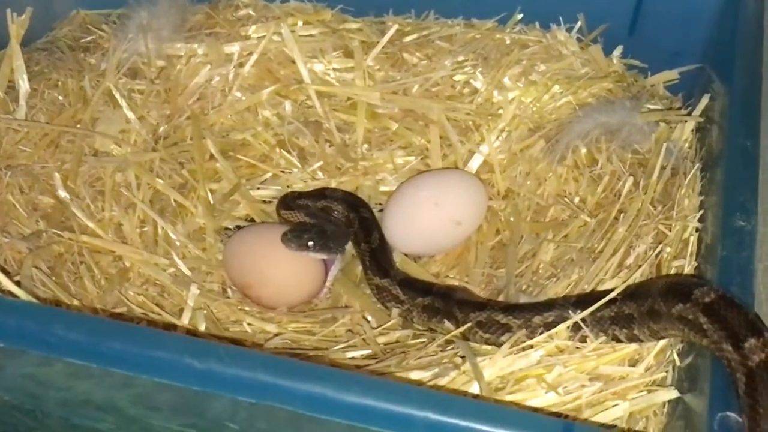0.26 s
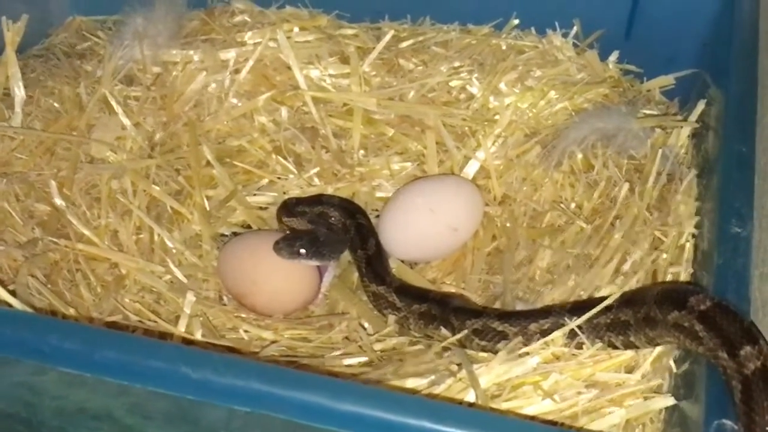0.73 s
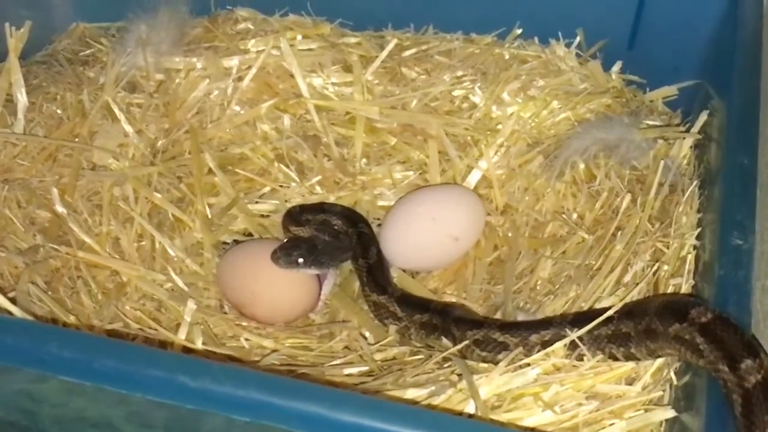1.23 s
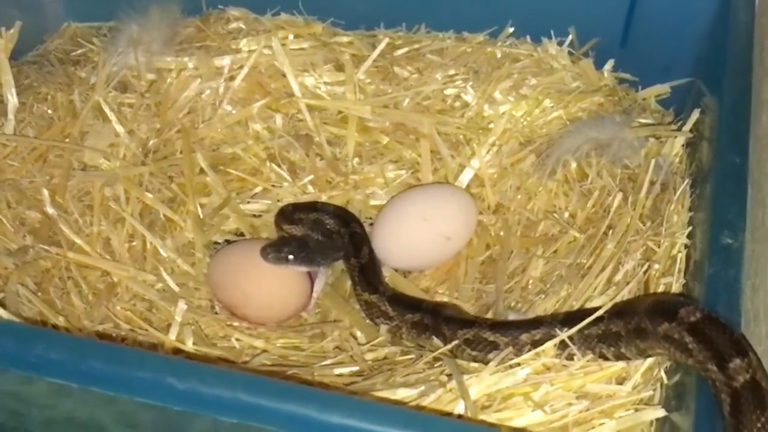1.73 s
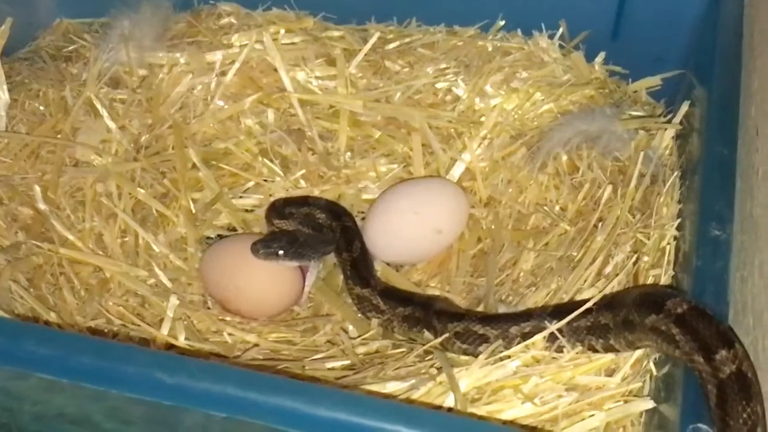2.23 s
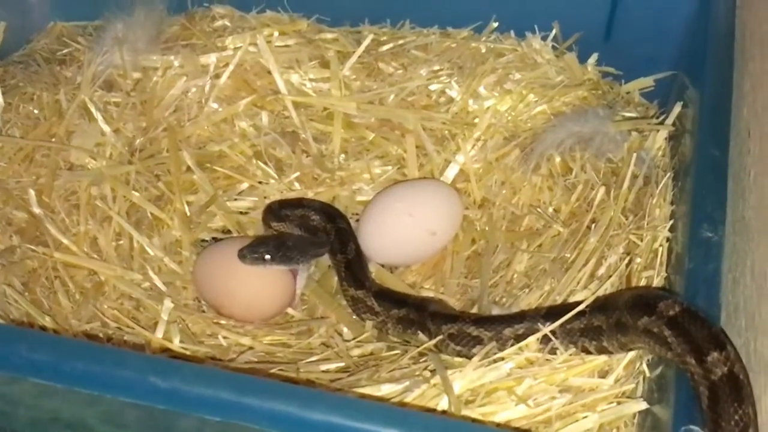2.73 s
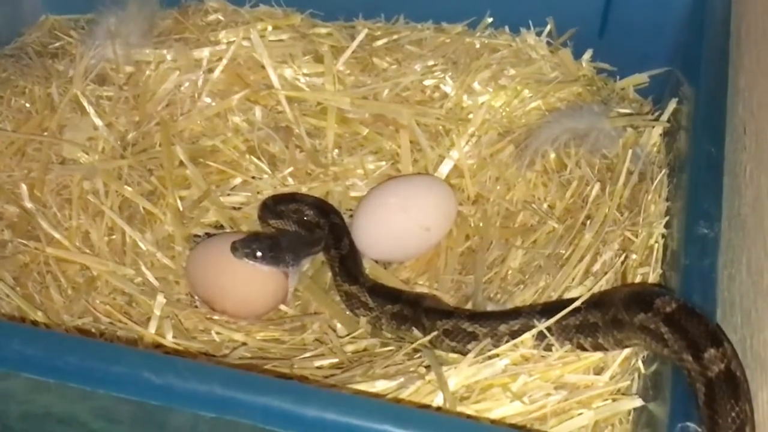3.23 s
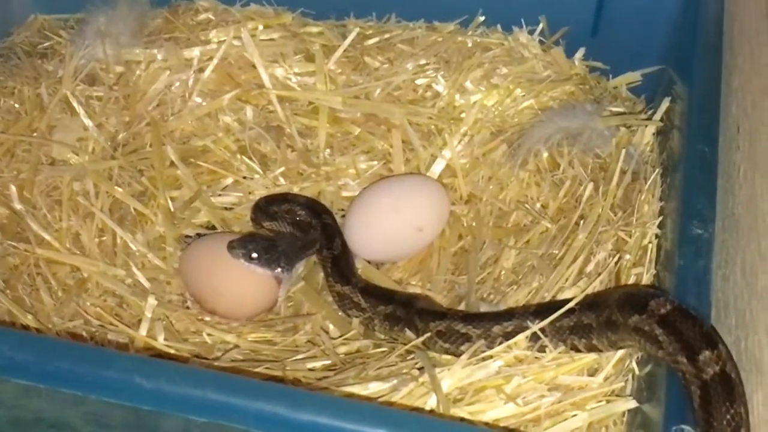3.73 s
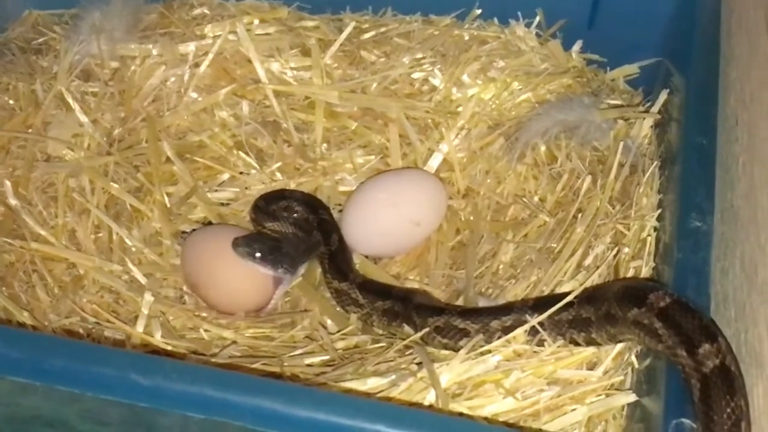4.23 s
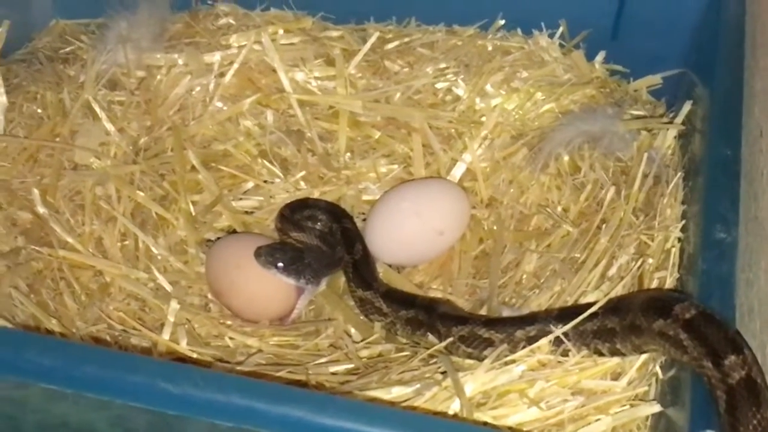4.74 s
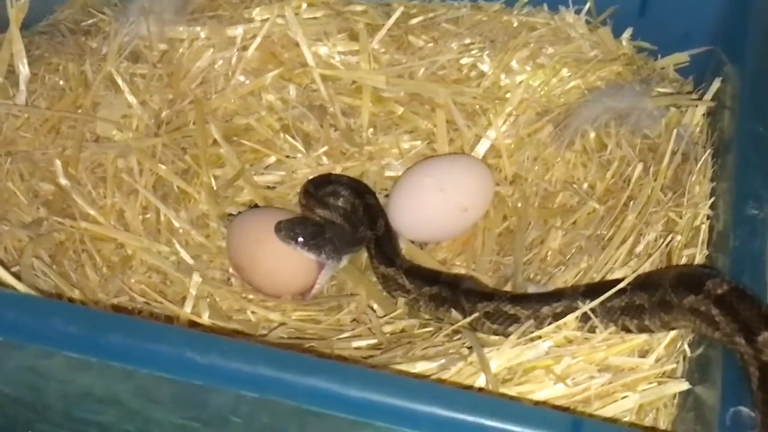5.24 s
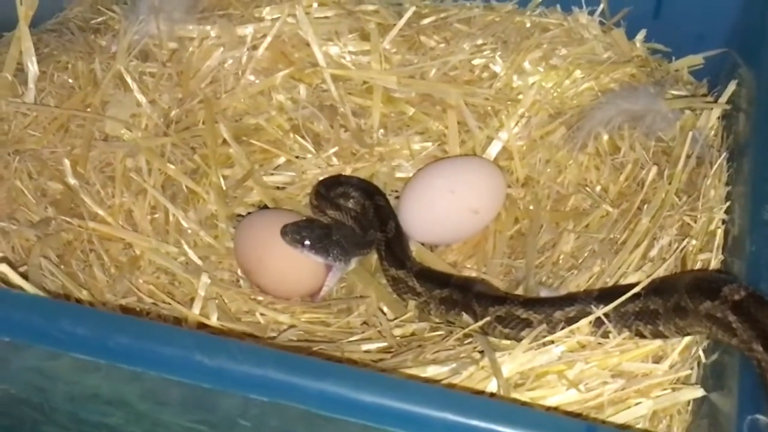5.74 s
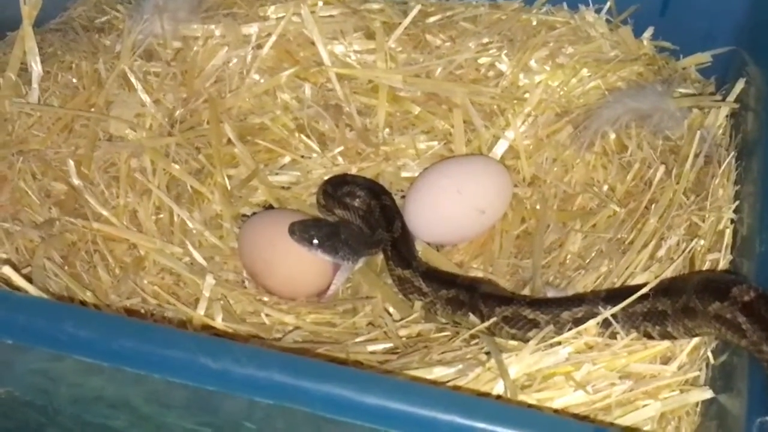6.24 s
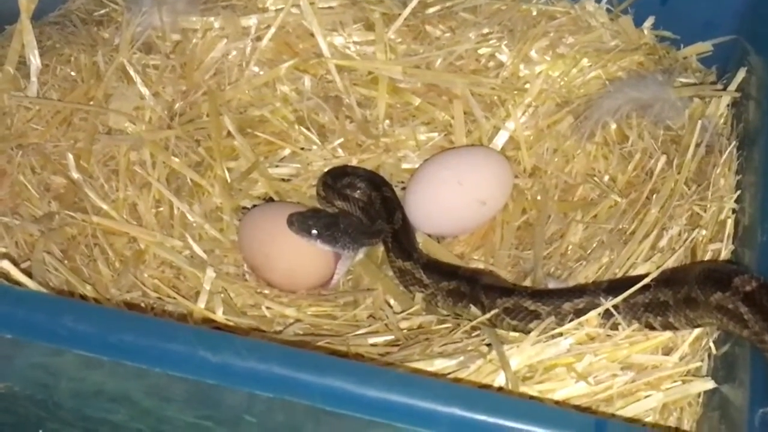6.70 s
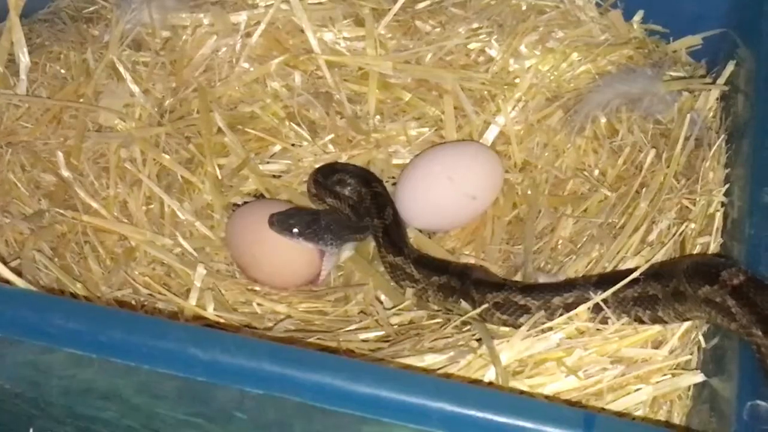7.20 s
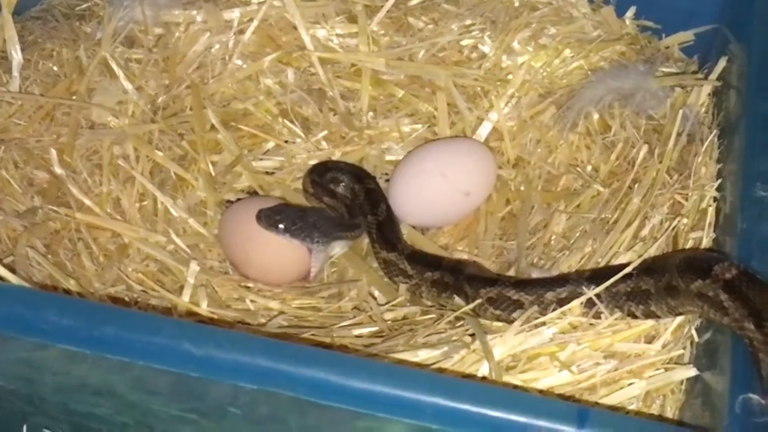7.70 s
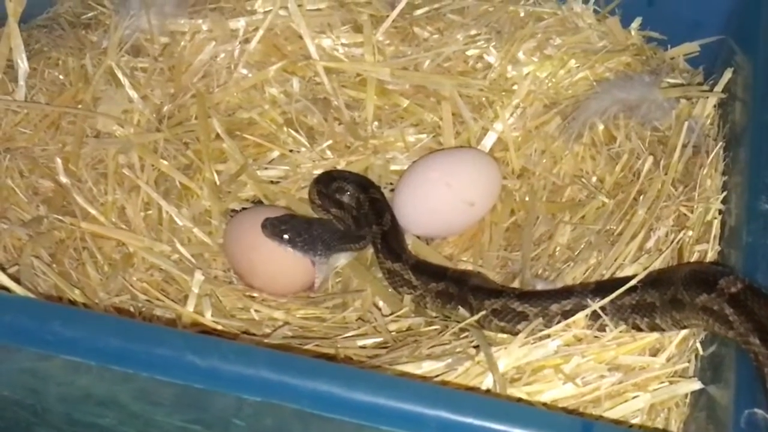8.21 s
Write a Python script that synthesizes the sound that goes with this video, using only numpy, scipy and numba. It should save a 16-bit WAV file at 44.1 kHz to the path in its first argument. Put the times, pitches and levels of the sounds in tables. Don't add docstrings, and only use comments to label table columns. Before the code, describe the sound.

Inside a small coop a hen growls long and hoarse twice, a short yelp between, then clucks clearly over crackling straw and low hum.

```python
import sys
import numpy as np
from scipy import signal
from scipy.io import wavfile
from scipy.ndimage import uniform_filter1d
from numba import njit

SR = 44100
rng = np.random.default_rng(int(sys.argv[2]) if len(sys.argv) > 2 else 0)


def attenuation_scalar(level_db):
    decades = np.asarray(level_db, float) / 20
    return 10 ** decades


def dump(signal):
    limited = np.clip(np.atleast_2d(signal).T, -1, 1)
    pcm = np.round(limited * 32767).astype(np.int16)
    wavfile.write(sys.argv[1], SR, pcm)


N = 373086
T = np.arange(N) / SR


def level(x, db):
    return x * attenuation_scalar(db) / np.sqrt(np.mean(x ** 2))


def colour(x, shape):
    hz, db = np.transpose(shape)
    f = np.arange(1, 2050) * SR / 4096
    cepstrum = np.fft.irfft(np.log(attenuation_scalar(np.interp(np.log(f), np.log(hz), db, db[0] - 19.0))))
    cepstrum[1:2048] *= 2
    cepstrum[2049:] = 0
    response = np.fft.irfft(np.exp(np.fft.rfft(cepstrum)))
    return signal.fftconvolve(x, response)[:len(x)]


@njit
def svf(x, hz, width):
    y, b, l = np.empty(len(x)), 0., 0.
    for i in range(len(x)):
        g, k = np.tan(np.pi * hz[i] / SR), width / hz[i]
        v = (b + g * (x[i] - l)) / (1 + g * (g + k))
        b, l, y[i] = 2 * v - b, l + 2 * g * v, k * v
    return y


def band(x, hz, width):
    return svf(x, np.full(len(x), 1. * hz), 1. * width)


def butter(x, order, hz, kind="low"):
    return signal.sosfilt(signal.butter(order, hz, kind, fs=SR, output="sos"), x)


def butter_in_phase(x, order, hz, kind="low"):
    return signal.sosfiltfilt(signal.butter(order, hz, kind, fs=SR, output="sos"), x)


def walk(rate, size=N):
    k = int(SR / rate)
    steps = np.repeat(rng.standard_normal(size // k + 1), k)
    return 1.3 * uniform_filter1d(uniform_filter1d(steps, k), k)[:size]


def follow(table, t=T):
    s, *columns = np.transpose(table)
    return [np.interp(t, s, c) for c in columns]


def unfold(table):
    span = slice(int(table[0][0] * SR), int(table[-1][0] * SR))
    return span, follow(table, T[span])


def syrinx(hz, jitter, rough, weak):
    phase = np.cumsum(hz) / SR
    sample = np.arange(len(hz))
    cycle = np.arange(1, int(phase[-1]))
    chance = rng.standard_normal((len(cycle), 2))
    at = np.interp(cycle, phase, sample)
    r = np.clip(np.interp(at, sample, rough * np.ones(len(hz))), 0, 1)
    at = np.clip(at + jitter * r * chance[:, 0] * SR / hz.mean(), 8, len(hz) - 10)
    weak = (weak * np.ones(len(hz)))[at.astype(int)]
    size = (1 - weak * (cycle % 2)) * (1 + .6 * r * chance[:, 1])
    taps = at.astype(int)[:, None] + np.arange(-7, 9)
    lag = taps - at[:, None]
    out = np.zeros(len(hz))
    np.add.at(out, taps, size[:, None] * np.sinc(lag) * np.cos(np.pi * lag / 16) ** 2)
    return out


def nest_box(x):
    scatter = .4
    for lag in (23, 41, 67, 109):
        gap = np.zeros(lag - 1)
        x = signal.lfilter(np.r_[-scatter, gap, 1], np.r_[1, gap, -scatter], x)
    return x


def clucks(calls, shape, rough, weak, wobble, hoarse=0):
    out = np.zeros(N)
    for table in calls:
        span, (hz, db) = unfold(table)
        rough_now = rough * (1 + hoarse * np.exp(-(T[span] - table[0][0]) / .022))
        pulses = syrinx(hz * (1 + wobble * walk(60, size=len(hz))), .15, rough_now, weak)
        out[span] += attenuation_scalar(db) * level(colour(pulses, shape), 0) * signal.windows.tukey(len(hz), .06)
    return out


# f/Hz, level/dB
AIR_COLOUR = [(50, -53), (85, 4.5), (101, -7), (126, -11.5), (285, -17), (355, -18), (687, -27),
              (1730, -32.5), (2460, -33), (4870, -41), (5810, -43), (9420, -47), (15000, -54), (16300, -61)]


def air():
    white = rng.standard_normal(N)
    drift = sum(attenuation_scalar(1.2 * walk(5)) * band(white, hz, .8 * hz) for hz in 140 * 2. ** np.arange(8))
    return level(colour(drift, AIR_COLOUR), -62)


# f/Hz, rms level/dB, moment of a crest t/s
MOTOR_TONES = [(36.02, -76.2, 4.2242), (60.012, -62.4, 4.2257), (61.685, -63.3, 4.2277),
               (72.035, -58.4, 4.2279), (73.398, -74.6, 4.2308), (75.315, -72.6, 4.2253)]
# f/Hz, width/Hz, rms level/dB
MOTOR_RUMBLE = [(34.8, 14, -83), (53.6, 36, -69), (70.36, 6, -66.5), (131, 1.7, -101), (240, 2.3, -77)]


def motors():
    out = sum(attenuation_scalar(db) * np.sqrt(2) * np.cos(2 * np.pi * hz * (T - crest)) for hz, db, crest in MOTOR_TONES)
    for hz, width, db in MOTOR_RUMBLE:
        noise = band(rng.standard_normal(N), hz, width)
        out += level(band(noise, hz, width), db)
    return out


# t/s, length/s, start f/Hz, end f/Hz, level/dB
WARBLE_NOTES = [(5.44, .07, 3200, 2900, -79), (5.485, 0.055, 2510, 2510, -77), (5.62, .09, 2440, 2430, -84),
                (5.7, 0.069, 2460, 2540, -82), (5.64, .07, 3180, 2900, -80), (5.71, 0.14, 2245, 2235, -78),
                (5.86, .09, 3270, 3050, -80), (5.94, .07, 2440, 2410, -81), (6.015, .04, 2600, 2580, -80),
                (6.06, .12, 2500, 2490, -78), (6.05, .06, 3400, 3380, -84), (6.168, 0.064, 2240, 2240, -76),
                (6.252, .07, 2240, 2220, -81), (6.3, .1, 3370, 3330, -81), (6.375, .055, 2100, 2280, -77),
                (6.49, .08, 2480, 2380, -81), (6.508, 0.084, 3250, 2880, -80),
                (6.59, .055, 2250, 2200, -77), (6.66, .045, 2220, 2215, -73),
                (6.729, 0.07, 3280, 3300, -79), (6.818, 0.07, 2120, 2450, -79),
                (6.92, .16, 2480, 2380, -78), (7.03, .11, 2228, 2215, -75), (7.148, .05, 2210, 2200, -78),
                (7.161, .06, 3380, 3390, -82), (7.233, .035, 2430, 2430, -79)]
# t/s, length/s, level/dB, start f/Hz
CHIRP_NOTES = [
    (7.4, 0.11, -72, 2447),
    (7.64, 0.095, -73, 2470),
    (7.905, 0.07, -75, 2480),
    (8.082, 0.1, -74.5, 2380),
]
CHIRP_STEPS = (0, 140, 270, 290)


def songbird():
    tremble_share = .011
    notes = [([(s, a), (s + length, b)], db, tremble_share) for s, length, a, b, db in WARBLE_NOTES]
    for s, length, db, hz in CHIRP_NOTES:
        glide = [(s + length * k / 3, hz + up) for k, up in enumerate(CHIRP_STEPS)]
        notes.append((glide, db, tremble_share / 3))
    out = np.zeros(N)
    for glide, db, tremble in notes:
        span, (hz,) = unfold(glide)
        swell_db_per_khz = 55 * np.clip(hz[-1] - hz[0], 0, 300) / 300
        swell_db = db + swell_db_per_khz * (hz - hz.mean()) / 1000
        hz = hz * (1 + tremble * (.35 + (hz / 2800) ** 8) * walk(160, size=len(hz)))
        whistle = np.sin(2 * np.pi * np.cumsum(hz) / SR)
        out[span] += attenuation_scalar(swell_db) * signal.windows.tukey(len(hz), .4) * whistle
    return out * attenuation_scalar(2 * walk(40))


# peak t/s, rise/s, fall/s, level of the top band/dB
STIRRINGS = [(.0, .02, 0.038, -66), (.1, 0.049, 0.91, -69.5), (.407, .006, .04, -63),
             (.425, 0.015, 0.05, -61.5), (.311, .006, .02, -68), (.727, .006, .03, -61),
             (.65, .02, .1, -66), (.76, .05, 0.024, -62.5), (1.12, 0.023, .04, -66), (1.54, .04, 0.43, -66),
             (1.71, .01, .04, -58), (1.73, 0.03, 0.22, -63), (1.83, .05, 0.22, -66),
             (2.04, 0.012, 0.018, -59), (2.51, 0.012, 0.092, -65), (2.56, 0.036, 0.33, -68.5),
             (2.652, 0.058, 0.021, -59), (3.28, .01, .15, -78), (3.33, 0.094, 0.03, -74.5),
             (3.5, .006, 0.026, -66), (3.58, 0.11, .05, -76), (4.235, .008, 0.022, -70.5),
             (4.445, .05, .03, -72), (4.52, 0.036, 0.046, -76), (4.58, .06, .06, -78),
             (3.635, 0.038, 0.053, -66.5), (3.894, 0.066, .15, -65.5), (3.962, 0.08, 0.1, -62.5),
             (4.02, 0.061, 0.15, -68.5), (4.261, 0.0092, 0.084, -64), (4.3, 0.027, 0.066, -64),
             (4.385, 0.11, 0.22, -70.5), (4.646, 0.014, 0.048, -63), (3.69, .04, 0.032, -70),
             (7.76, 0.16, 0.38, -73.5), (7.911, 0.093, 0.076, -62), (7.994, 0.045, 0.23, -66),
             (8.1, .1, 0.57, -77)]
# t/s, level/dB
RESTLESSNESS = [(0, -80.5), (2, -70), (2.3, -79.5), (2.7, -79.5), (3.2, -79.5), (4.6, -83.5), (5.1, -82),
                (6.5, -82.5), (7.5, -80.5), (8.46, -81.5)]


def stirring():
    (restless_db,) = follow(RESTLESSNESS)
    power = attenuation_scalar(restless_db + .5 * walk(33)) ** 2
    for s, rise, fall, db in STIRRINGS:
        power += attenuation_scalar(db - 21.5 * np.maximum((s - T) / rise, (T - s) / fall)) ** 2
    return np.sqrt(power)


# f/Hz, level/dB
STRAW_COLOUR = [(290, -46), (500, 0), (1290, -3), (2560, -1.5), (4800, -3), (5630, 0), (7870, -3),
                (8980, 0), (10500, -3), (14500, -3), (16300, 0)]
# t/s, peak level/dB, centre f/Hz
STALK_SNAPS = [(2.4153, -50, 9270), (2.464, -46.5, 1530), (2.507, -40.5, 8930), (2.5488, -34.5, 9080),
               (2.6196, -43, 2360), (2.6385, -44, 9470), (2.7797, -53, 2010), (2.9793, -51, 4300),
               (3.0417, -48.5, 2020), (3.5914, -53, 13000), (3.6198, -53, 4000), (4.006, -45, 12000),
               (4.073, -49, 8000), (4.143, -51, 13000), (4.6405, -49, 6720), (3.4914, -41, 1750),
               (3.632, -44.5, 2580), (3.783, -43.5, 8150), (3.9157, -41, 7000), (4.0225, -41, 2480),
               (4.0353, -33.5, 4600), (4.1075, -41.5, 1890), (4.2282, -43, 10900), (4.257, -46, 8850),
               (4.3833, -45, 5700), (4.478, -44, 5630), (4.817, -56, 5340), (4.953, -49, 1600),
               (5.372, -51, 2000), (6.144, -50, 3400), (6.265, -53, 2240), (6.801, -47, 3000),
               (7.211, -53, 5000), (7.259, -50, 2180), (7.988, -42, 5470), (8.067, -40.5, 5260),
               (8.097, -43.5, 11500), (8.189, -43.5, 8850), (8.19, -43, 1300), (8.221, -53, 4040),
               (7.949, -46, 7000)]
# t/s, level/dB, f/Hz, decay by 60 dB/s
KNOCKS = [
    (4.951, -50.5, 99.5, 0.66),
]


def straw():
    grains = (rng.random(N) < 2500 / SR) * attenuation_scalar(2.2 * rng.exponential(size=N)) * rng.standard_normal(N)
    white = level(grains, 0) + level(rng.standard_normal(N), -1.1)
    bands = sum(attenuation_scalar(2.5 * walk(25)) * band(white, hz, .6 * hz) for hz in 700 * 1.6 ** np.arange(8))
    crackle = colour(bands, STRAW_COLOUR)
    top = butter(crackle, 4, (11800, 15800), "band")
    out = crackle / top.std() * stirring()
    ticks = (rng.random(N) < 25 / SR) * rng.standard_normal(N)
    out += attenuation_scalar(-48) * band(ticks, 5300, 7000)
    t = T[:1500]
    for s, peak_db, hz in STALK_SNAPS:
        burst = rng.standard_normal(len(t)) * (np.exp(-t / .001) + .21 * np.exp(-t / .015))
        burst[:2] = 2.5, -2.5
        burst = .3 * burst + band(burst, hz, .5 * hz)
        i = int(s * SR)
        out[i:i + len(t)] += attenuation_scalar(peak_db) * burst / np.abs(burst).max()
    for s, db, hz, t60 in KNOCKS:
        late = np.clip(T - s, 0, None)
        out += attenuation_scalar(db) * np.sin(2 * np.pi * hz * late) * np.exp(-np.log(1000) * late / t60)
    return out


# t/s, pitch f/Hz, level/dB
FAR_CALLS = [
    [(2.7, 326, -73), (2.76, 332, -75), (2.85, 335, -72), (2.9, 334.6, -74), (2.95, 340.7, -73),
     (3.03, 337, -80.5), (3.07, 338, -83), (3.13, 342.5, -80), (3.25, 340, -85)],
    [(5.25, 328, -78), (5.3, 328, -74), (5.34, 325, -77), (5.42, 322, -79)],
    [(7.59, 343, -79), (7.63, 339.5, -74.5), (7.66, 330, -77), (7.69, 317, -71), (7.75, 315, -75),
     (7.79, 310, -84), (7.85, 307, -93)],
]
# f/Hz, level/dB
FAR_SPECTRUM = [(600, -10), (1350, -6.5), (1700, -4.5), (2100, -3.5), (2600, -9), (3200, -38)]
# t/s, f/Hz
FAR_THROAT_PATH = [(2.7, 1600), (2.77, 1660), (2.8, 1980), (2.85, 1660), (2.9, 1750), (2.95, 2040),
                   (3.0, 1870), (3.25, 1874), (5.3, 1880), (7.6, 1700), (7.66, 1700), (7.7, 1890)]


def far_hen():
    voice = clucks(FAR_CALLS, FAR_SPECTRUM, .22, .25, .005)
    (throat_hz,) = follow(FAR_THROAT_PATH)
    return attenuation_scalar(1.2 * walk(25) - .5) * (voice + attenuation_scalar(1) * svf(voice, throat_hz, 180.0))


# a table of (t/s, pitch f/Hz, level/dB) and the throat f/Hz of each
MUTTER_CALLS = [
    ([(3.085, 247, -86), (3.1, 256.5, -69), (3.14, 237, -71), (3.17, 240, -76)], 350),
    ([(3.855, 277, -53), (3.865, 249.4, -56), (3.9, 236.3, -58.5), (3.94, 228, -71)], 1400),
    ([(4.008, 320, -66), (4.025, 345.3, -50.5), (4.045, 321, -53), (4.075, 330, -103)], 590),
]
# f/Hz, level/dB
MUTTER_SPECTRUM = [(88, -12), (150, 20.5), (347, 8), (675, -5), (1050, 1), (1490, -0.5), (2030, -10),
                   (3000, -24), (3900, -29), (6600, -120)]


def mutters():
    out = np.zeros(N)
    for table, throat_hz in MUTTER_CALLS:
        note = clucks([table], MUTTER_SPECTRUM, .07, .04, .003)
        out += note + attenuation_scalar(3) * band(note, throat_hz, 220)
    return out


# t/s, pitch f/Hz, level/dB
CLUCK_CALL = [(4.941, 290, -52), (4.951, 284.5, -35), (4.96, 262.7, -39), (4.972, 268, -38.5),
              (4.993, 281.6, -38), (5.025, 276, -38), (5.039, 276.3, -38), (5.067, 279, -38.5),
              (5.1, 269.8, -39.5), (5.113, 277, -37.5), (5.133, 276.7, -38), (5.153, 274.6, -39.5),
              (5.169, 286.6, -40), (5.181, 276.4, -40), (5.207, 276, -36.5), (5.229, 272.5, -40.5),
              (5.243, 273, -45)]
# f/Hz, level/dB
CLUCK_SPECTRUM = [(30, -10), (100, 11), (270, 8.5), (555, 7.5), (846, 8), (1130, -5.5), (1430, 3.5),
                  (1960, -9), (2290, -19.5), (2650, -20.5), (3100, -29.5), (3630, -28), (4830, -27.5),
                  (5480, -24.5), (6320, -55), (9850, -29.5), (11000, -48), (14300, -82), (22000, -120)]
# t/s, gain of the bright partials level/dB
CLUCK_BEAK_GAIN = [(4.94, -1), (4.955, 5), (4.968, 2), (4.982, 3), (5.005, -5), (5.035, 3), (5.078, 1.5),
                   (5.098, 4), (5.125, -3.5), (5.165, 2.5), (5.25, -3)]
# t/s, gain level/dB
POUCH_GAIN = [(4.95, 3), (4.96, -14), (4.971, -16), (4.98, -1), (5.025, 2), (5.04, -4), (5.065, 16.5),
              (5.085, -2), (5.101, -9), (5.113, 3), (5.133, -8), (5.16, 0), (5.207, 8), (5.23, -7),
              (5.245, 6)]


def clear_cluck():
    voice = clucks([CLUCK_CALL], CLUCK_SPECTRUM, .022, .03, .0015, hoarse=9)
    voice = butter(voice, 2, 150, "high")
    voice = butter_in_phase(voice, 4, 200, "high")
    (beak_db,), (pouch_db,) = follow(CLUCK_BEAK_GAIN), follow(POUCH_GAIN)
    bright = voice - butter_in_phase(voice, 2, 1250)
    windpipe = attenuation_scalar(14) * band(voice, 3726, 110)
    voice = voice + windpipe + (attenuation_scalar(beak_db) - 1) * bright
    fourth_partial = band(band(voice, 1080, 180), 1080, 180)
    return voice + (attenuation_scalar(pouch_db) - 1) * fourth_partial


# t/s, pitch f/Hz, level/dB
YELP_CALL = [(1.0955, 365, -29.5), (1.104, 393, -38), (1.114, 407, -31.5), (1.124, 394, -42),
             (1.135, 405, -79)]
# f/Hz, level/dB
YELP_SPECTRUM = [(110, -30), (190, 18.5), (409, 3.5), (776, 6.5), (1640, 7.5), (2950, -15), (4490, -14),
                 (5100, -29), (5690, -17), (6120, -20.5), (8210, -21), (10000, -16), (11200, -35),
                 (13000, -26), (15000, -43)]
# f/Hz, width/Hz, boost level/dB
YELP_BEAK_RINGS = [(1600, 110, -3), (4600, 170, 9), (5980, 100, 16.5), (7200, 220, 8)]


def yelp():
    voice = nest_box(clucks([YELP_CALL], YELP_SPECTRUM, .08, .2, .003))
    return voice + sum(attenuation_scalar(db) * band(voice, hz, width) for hz, width, db in YELP_BEAK_RINGS)


# f/Hz, width/Hz, boost level/dB
PIPE_RINGS = [(830, 70, 0), (1000, 60, -3)]


def growl_throat(low, throat, mouth_hz, hollow_hz):
    n = len(low)
    throat_hz, upper_hz, upper_db, pipe_hz = throat
    low = low + sum(attenuation_scalar(db) * band(low, f, w) for f, w, db in PIPE_RINGS) + attenuation_scalar(2.5) * svf(low, pipe_hz, 90.0)
    shiver = 1 + .016 * walk(22, size=n)
    upper_gain = attenuation_scalar(upper_db + .5 * walk(15.75, size=n))
    upper = upper_gain * svf(low, upper_hz * (1 + .025 * walk(3.6, size=n)), 120.0)
    main = attenuation_scalar(9.5) * svf(low, throat_hz * shiver, 95.0)
    low = low + main + upper + attenuation_scalar(-2) * band(low, mouth_hz, 89)
    return low - .54 * band(low, hollow_hz, 210)


# ratio to the tracked f, width/Hz, boost level/dB
BEAK_RINGS = [(.48, 402, 10), (0.613, 430, 13.5), (0.779, 300, 10), (0.99, 220, 20.5), (1.26, 200, 12),
              (1.63, 200, 13), (1.9, 220, 14), (1.47, 240, 5), (2.13, 300, 22)]


def growl_beak(high, beak_hz, left):
    gape = np.clip(1.5 - left / .14, 0, 1)
    rasp = gape * attenuation_scalar(11.5) * band(high, 3700, 1360)
    rings = 0
    for ratio, width, db in BEAK_RINGS:
        gain = attenuation_scalar(db + 3 * walk(9.8, size=len(high)))
        rings = rings + gain * svf(high, ratio * beak_hz, 1. * width)
    high = high + rasp + (1 - .6 * gape) * rings
    return high - .81 * svf(high, 1.11 * beak_hz, 500.)


# t/s, effort as level/dB, beak resonance f/Hz
GROWL_CALLS = [
    [(0.0, -37.5, 5400), (.152, -43.5, 5550), (.175, -38.5, 6600), (.3, -37.5, 6440), (.5, -35.5, 6850),
     (.76, -37, 6920), (.79, -36.5, 6600), (.82, -35, 5900), (.888, -34, 6250), (.93, -59, 6300)],
    [(1.135, -70, 7000), (1.153, -36.5, 7200), (1.25, -36.5, 6770), (1.33, -36.5, 6950), (1.78, -34, 7230),
     (1.86, -33.5, 7040), (1.94, -30.5, 6400), (1.99, -27.5, 6400), (2.02, -60, 6600)],
]
# t/s, pulse rate f/Hz, roughness [0-1], weakness of alternate pulses [0-1]
MEMBRANE_BEATING = [
    [(0, 324, .45, .6), (.15, 326, .6, .5), (.25, 330, .45, .6), (.62, 340, .45, .55), (.66, 305, .25, .3),
     (.71, 298, .22, .25), (.74, 298, .45, .3), (.8, 298, .55, .35), (.93, 303, .4, .3)],
    [(1.135, 314, .4, .6), (1.3, 345, .55, .5), (1.45, 348, .65, .5), (1.63, 354, .4, .6),
     (1.84, 356, .5, .6), (1.9, 332, .22, .8), (2.02, 329, .2, .8)],
]
# t/s, main f/Hz, upper f/Hz, upper gain level/dB, windpipe f/Hz
THROAT_SHAPE = [
    [(0, 1140, 1390, -1, 480), (.1, 1150, 1540, 18, 497), (.14, 1130, 1380, 8, 620),
     (.25, 1150, 1430, 2, 646), (.42, 1134, 1340, 7.5, 645), (.53, 1110, 1490, 9.5, 520),
     (.63, 1150, 1390, 12, 530), (.69, 1230, 1475, 17.5, 597), (.8, 1206, 1360, -6, 540),
     (.93, 1220, 1320, 3, 586)],
    [(1.135, 1150, 1440, -8, 487), (1.25, 1200, 1450, 3, 455), (1.35, 1180, 1370, 10, 507),
     (1.5, 1160, 1370, 7, 515), (1.62, 1230, 1370, 4, 547), (1.76, 1236, 1600, 14, 524),
     (1.86, 1285, 1470, 5, 540), (1.95, 1280, 1460, 5.5, 493), (2.02, 1240, 1370, -1, 500)],
]
MOUTH_RING = (2240, 2020)
HOLLOW_BAND = (2040, 1720)
# f/Hz, level/dB
GROWL_SPECTRUM = [(71, -81), (120, -7), (341, -5), (418, -12.5), (493, -6), (757, -10), (1190, -7),
                  (2070, -9.5), (2640, -19), (4320, -16.5), (4880, -23), (6910, -23.5), (7820, -34),
                  (9020, -27.5), (16000, -49)]
# t/s, gain level/dB
THROAT_SURGES = [(.09, 1), (.252, 3.5), (.388, 1.5), (.442, 1.5), (.55, 3), (.628, 1.5), (.804, 4),
                 (1.185, 0), (1.335, -0.5), (1.56, 3), (1.615, 4), (1.668, -2), (1.75, -0.5), (1.978, -3)]


def growls():
    out = np.zeros(N)
    surge_db = sum(db * np.exp(-((T - s) / .0096) ** 2 / 2) for s, db in THROAT_SURGES)
    settings = zip(GROWL_CALLS, MEMBRANE_BEATING, THROAT_SHAPE, MOUTH_RING, HOLLOW_BAND)
    for table, beating, throat, mouth_hz, hollow_hz in settings:
        span, (db, beak_hz) = unfold(table)
        t = T[span]
        n, since, left = len(t), t - table[0][0], table[-1][0] - t
        hz, rough, weak = follow(beating, t)
        pulses = syrinx(hz * (1 + .013 * walk(35, size=n)), .18, rough, weak)
        flutter_depth = .6 * np.clip(.3 + walk(14, size=n), 0, 1)
        flutter = 1 + flutter_depth * np.sin(2 * np.pi * np.cumsum(hz / 3) / SR)
        puff = np.sqrt(uniform_filter1d(np.abs(pulses), size=100) + 1e-4) * rng.standard_normal(n)
        source = level(nest_box(pulses * flutter), 0) + .7 * rough * level(puff, 0)
        voice = butter(colour(source, GROWL_SPECTRUM), 5, 200, "high")
        voice = voice - np.clip(.35 + .6 * since, 0, .75) * svf(voice, hz, 90.)
        body = butter_in_phase(voice, 3, 2600)
        treble = growl_beak(voice - body, beak_hz, left)
        body = growl_throat(body, follow(throat, t), mouth_hz, hollow_hz)
        treble_db = -17.5 - 14 * np.exp(-since / .024) + 2 * since
        treble_db = treble_db - 18 * np.exp(-((t - 1.3) / .0062) ** 2 / 2)
        sputter_db = 1.2 * walk(60, size=n)
        body = level(body, -1.02) * attenuation_scalar(surge_db[span] + sputter_db)
        fade = np.clip(np.minimum(since + .0066, left) / .007, 0, 1)
        out[span] += fade * attenuation_scalar(db) * (body + level(treble, 0) * attenuation_scalar(treble_db))
    return out


def coop(x, chance):
    t60_s, dull_hz = .21, 2220
    t = T[:SR // 2]
    noise = chance * np.exp(-np.log(1000) * t / t60_s) * (t > .003)
    dull = butter(noise, 1, dull_hz)
    tail = dull + (noise - dull) * np.exp(-t / .013)
    return signal.fftconvolve(x, tail / np.linalg.norm(tail))[:N]


def scene():
    boards = rng.standard_normal(SR // 2)
    bird, stalks, far, near = songbird(), straw(), far_hen(), clear_cluck()
    hens = mutters() + attenuation_scalar(-1) * yelp() + growls()
    calls = attenuation_scalar(-7) * (hens + attenuation_scalar(-9) * near)
    echo = coop(calls + attenuation_scalar(-20) * stalks + .76 * far + attenuation_scalar(-9) * bird, boards)
    return (air() + motors() + 1.56 * bird + stalks + 1.4 * far + near + hens + echo)[None]


def roll_off(x):
    return signal.sosfilt(signal.butter(12, 15850, fs=SR, output="sos"), x)


# f/Hz, width/Hz, share removed
SOUND_PORT = [(5000, 170, 0.61), (10470, 290, 1), (15700, 1000, -0.3)]


def record(dry):
    x = dry[0]
    for hz, width, share in SOUND_PORT:
        x = x - np.clip(share, -1, 1) * band(x, hz, width)
    x = signal.sosfilt(signal.ellip(10, .3, 60, 15980, fs=SR, output="sos"), x)
    return roll_off(x[None])


dry = scene()
out = record(dry)
dump(out)
```